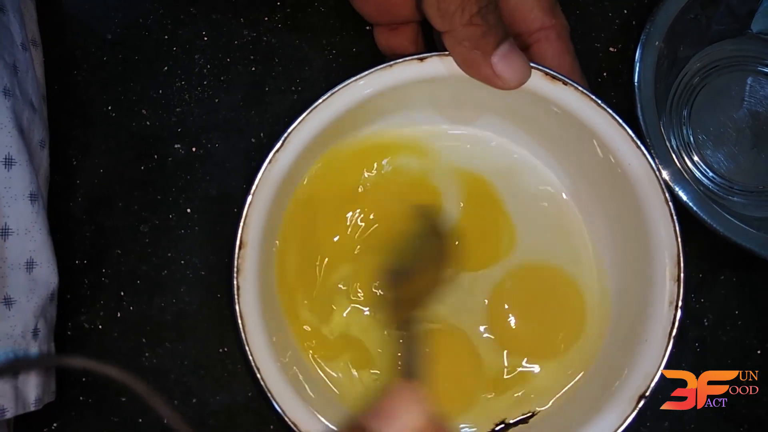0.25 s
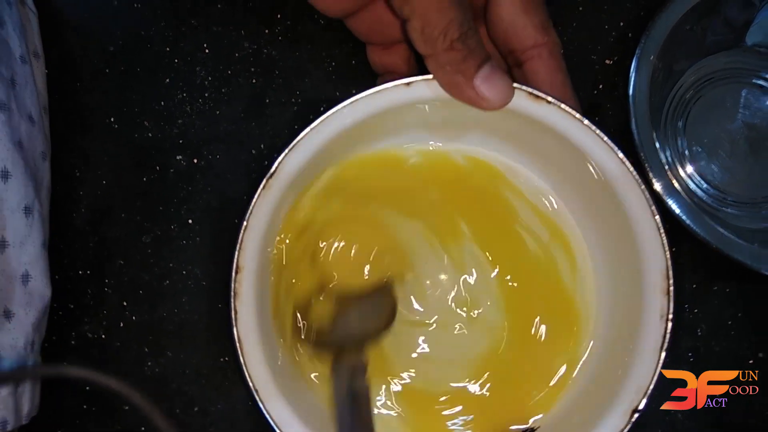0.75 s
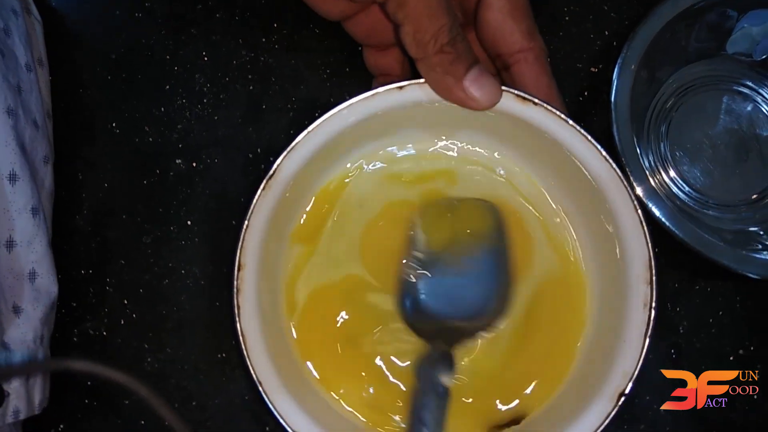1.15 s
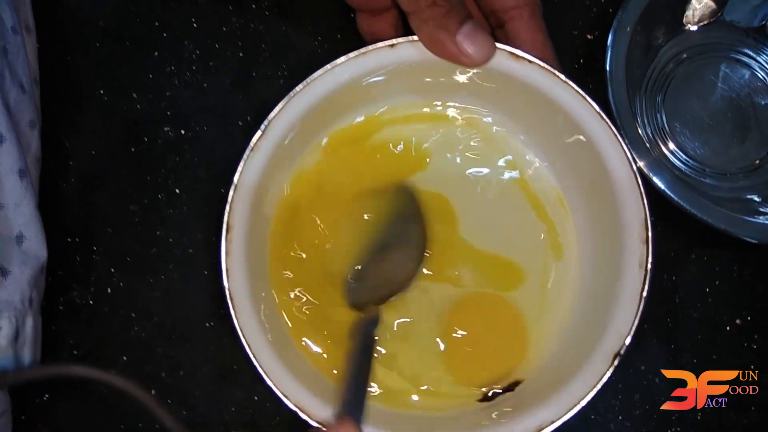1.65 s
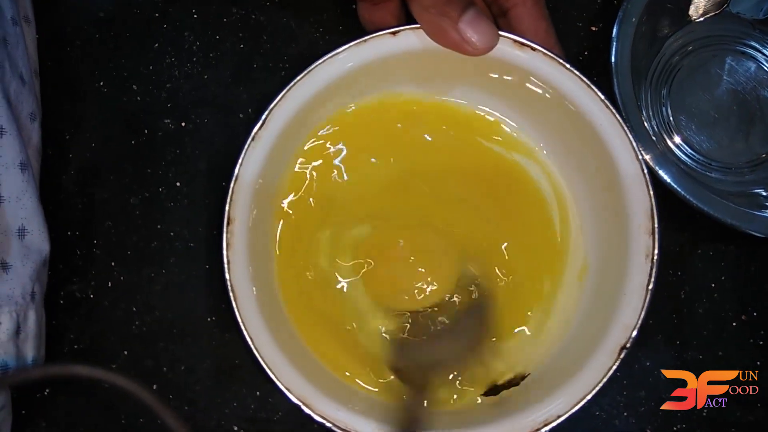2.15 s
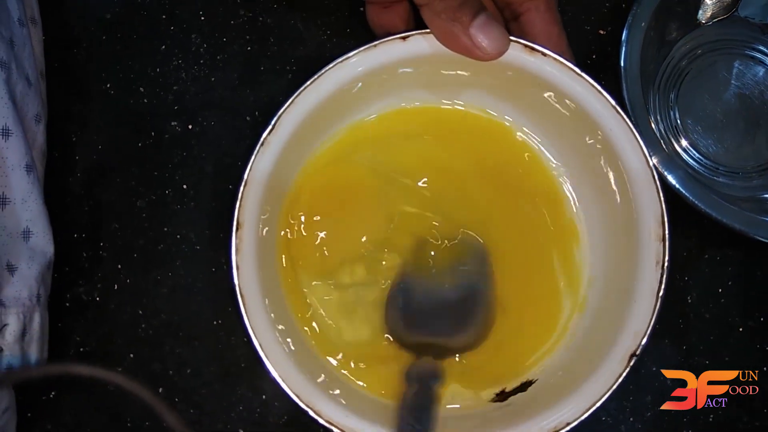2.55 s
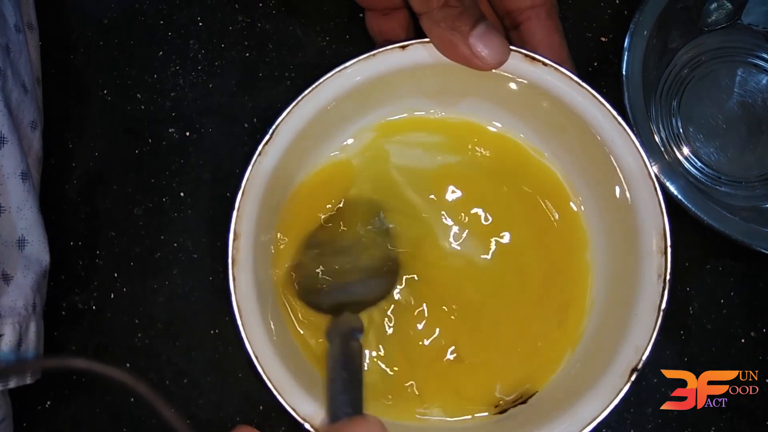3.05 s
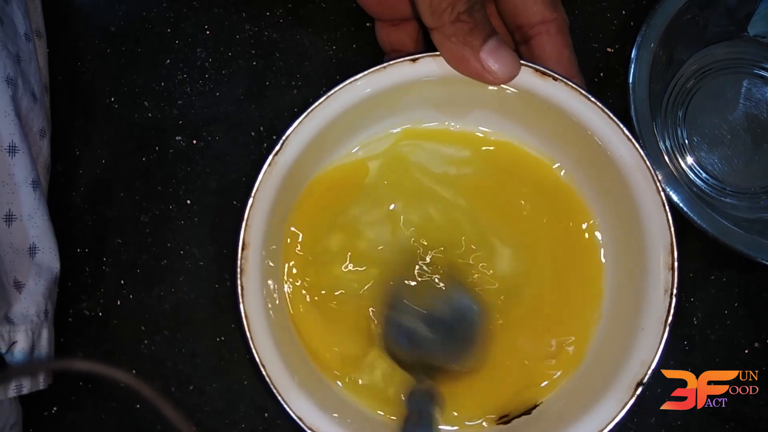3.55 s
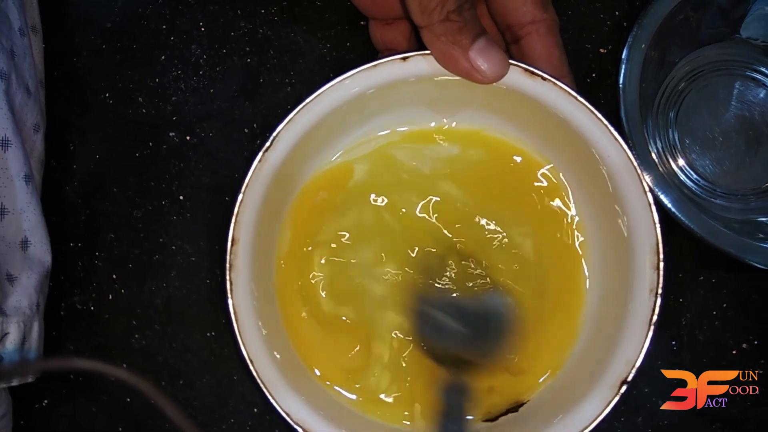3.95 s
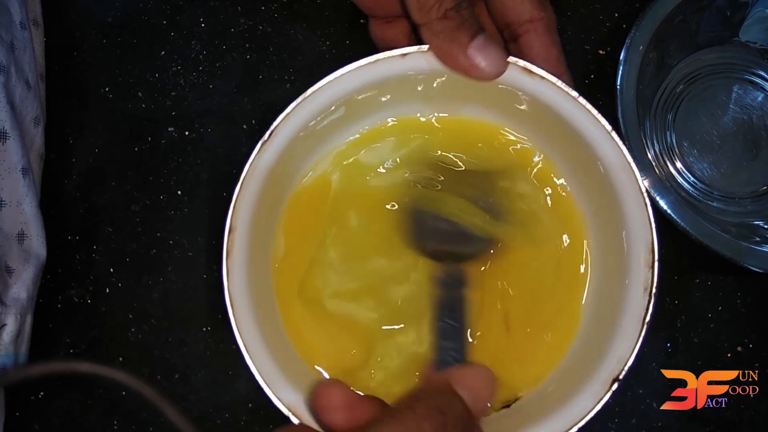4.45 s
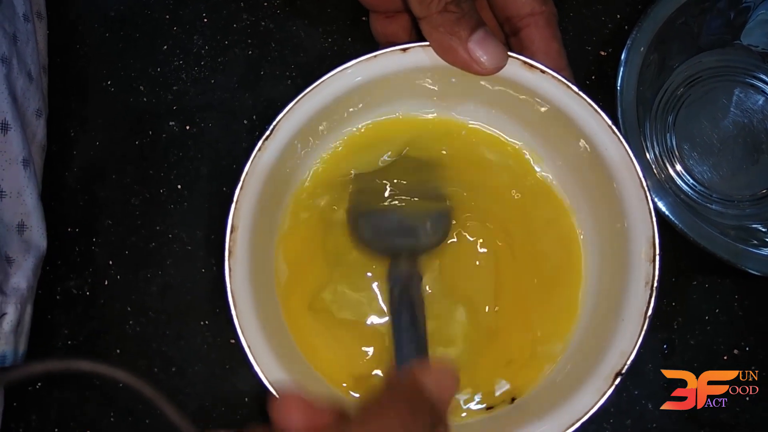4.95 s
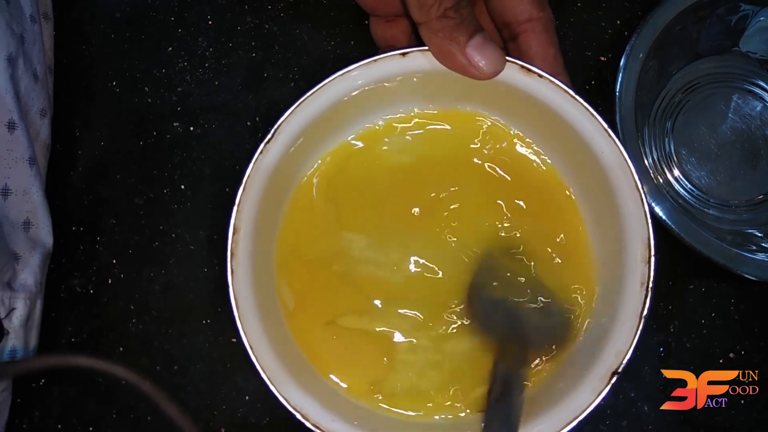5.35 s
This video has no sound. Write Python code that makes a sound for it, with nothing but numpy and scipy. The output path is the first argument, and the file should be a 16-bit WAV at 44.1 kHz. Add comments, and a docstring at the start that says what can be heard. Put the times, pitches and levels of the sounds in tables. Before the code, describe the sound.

Heard from very near in a small kitchen: gritty spoon skids in a bowl, a cluster of hard bright clinks, a short lull, then one loud clack and more irregular knocks. Finally the spoon stays down, rubbing quickly and softly through the egg in regular strokes. Faint low hum and room hiss continue throughout; the stereo image is wide in the treble.

```python
"""A metal spoon beats eggs in an enamelled bowl held by one hand, heard close up in stereo.
Strikes, skids and whisking strokes are bursts of uneven force that ring a model of the bowl.
Single tones of the bowl sing out and bend; sparse random echoes are the kitchen's answer.
Underneath lie a low appliance hum and a soft room noise, both made of filtered noise."""
import sys
import numpy as np
from scipy import signal
from scipy.fft import rfft, irfft
from scipy.io import wavfile
from scipy.ndimage import uniform_filter1d

SR = 44100
rng = np.random.default_rng(int(sys.argv[2]) if len(sys.argv) > 2 else 0)


def store_wav(level_fs):
    """Save 16-bit WAV to argv[1]."""
    pcm = np.round(np.clip(np.atleast_2d(level_fs), -1, 1) * 32767)
    wavfile.write(sys.argv[1], SR, pcm.T.astype(np.int16))


N = 247842  # length of the scene in samples

WHISK_FROM_S, RESTING_DB = 4.035, -47  # the spoon lands; its faint rub between strokes


def spoon():
    """Everything the spoon does: strikes, skids, strokes, singing tones and a faint resting rub."""
    out = np.zeros((2, N))
    for play, table in ((strike, STRIKES), (skid, SKIDS), (stroke, STROKES), (sing, SINGING)):
        for row in table:
            add(out, *play(*row))
    rest_length = N / SR - WHISK_FROM_S + LIFT_S
    add(out, *skid(WHISK_FROM_S, rest_length, RESTING_DB, RESTING_DB, -8.0, -7, step=.08, wet=True))
    return out


# Spoon strikes: (time [s], level before the energy boost [dB],
# middle ring relative to treble [dB], upper ring relative to treble [dB])
STRIKES = [(0.339, -14.5, -9.5, -16.5), (0.441, -23, -22.5, -22), (0.4961, -31, -3.5, -14.5),
           (0.638, -3, -11.5, -8), (0.76, -27, -19.5, -10), (0.7883, 3, -15.5, -10.5),
           (0.8572, 1, -15, -10), (0.9302, 3, -19, -15.5), (1.16, -23.5, -28.5, -23.5),
           (1.7259, 6.5, -19.5, -13.5), (1.734, -4.5, -7.5, -9.5), (1.738, -0.5, -14, -5.5),
           (2.08, 3, -14.5, -14), (2.137, -2.5, -31.5, -12.5), (2.31, -23, -16.5, -13.5),
           (2.368, -1, -27, -11.5), (2.4557, -13, -25, -16), (2.517, -30.5, 0, -10),
           (2.5654, -29.5, -14, -16), (2.591, 3.5, -14, -16.5), (2.834, -3, -16.5, -12),
           (3.2211, -1, -15, -11.5), (3.412, 2, -12.5, -11), (3.62, 3, -15.5, -12),
           (3.667, -10, -16.5, -15.5), (4.0349, -13, -11, -13.5), (4.497, -23.5, -27, -4),
           (4.759, -23, -15, -14.5), (4.784, -17, -34.5, -18.5), (4.8988, -19.5, -20, -13.5),
           (5.013, -15, -30.5, -23), (5.1306, -14, -30, -8.5), (5.288, -12, -20, -21),
           (5.438, -19.5, -16, -9.5), (5.467, -19, -9.5, -11.5)]
TAP_ENERGY_DB = 11.5  # energy of a ring over its peak level
STRIKE_T60_S = 0.02236  # time to fade by 60 dB, for a firm strike
STRIKE_LOW_DB, STRIKE_THUMP_DB = -4.5, -10  # low ring and thump relative to the middle ring
RATTLE_RISE_S = 0.00287  # the rattle after a click builds up


def strike(s, db, middle_db, upper_db):
    """One click with a short rattle; a damped strike also stops the clear tones early."""
    t = np.arange(600) / SR
    t60 = STRIKE_T60_S * np.interp(db, [-30, -5], [.45, 1])  # light ticks die sooner
    rise = np.minimum(t / RATTLE_RISE_S, 1)
    fade = gain_of(-11.5 - 60 * t / max(1.286 * t60, .001))
    force = rise * fade * grit(len(t), spread_db=4.5, lumpy_db=5.0)
    force[0] += 1  # the click itself
    force = force / np.linalg.norm(force)
    ranges_db = [middle_db + STRIKE_THUMP_DB, middle_db + STRIKE_LOW_DB, middle_db, upper_db, 0]
    sound = ring(force, ranges_db, t60, min(t60 / 0.019, .8), clear_db=-7.5)
    return s, gain_of(db + TAP_ENERGY_DB) * sound


def struck(s, within=.013):
    """Whether a strike falls at about this moment."""
    return np.min(abs(np.transpose(STRIKES)[0] - s)) < within


# Spoon skids over the bottom: (time [s], length [s], level at start [dB], level at end [dB],
# middle ring relative to treble [dB], upper ring relative to treble [dB])
SKIDS = [(-0.03, 0.158, -20.5, -32.5, -17.5, -11.5), (0.095, 0.0346, -29.5, -13.5, -24.5, -12.5),
         (0.129, 0.0633, -24, -30.5, -17, -9), (0.196, 0.0784, -35, -36.5, -9, -5.5),
         (0.27, 0.0445, -33.5, -16.5, -18, -9), (0.32, 0.0587, -17.5, -26.5, -19.5, -13.5),
         (0.404, 0.221, -64.5, -47, -6.5, -13.5), (0.635, 0.0632, -24.5, -52.5, -7.5, -6),
         (0.701, 0.051, -33.5, -34, -11.5, -8), (0.753, 0.0937, -18, -25.5, -17, -18),
         (0.86, 0.0842, -19, -21, -19, -12), (0.933, 0.173, -23.5, -36.5, -15, -8.5),
         (1.122, 0.1, -47, -51.5, -13.5, -15), (1.205, 0.299, -49, -43.5, -13.5, -13.5),
         (1.5, 0.225, -47, -51.5, -11, -13), (1.728, 0.1115, -22.5, -30.5, -11.5, -10),
         (2.081, 0.0632, -20.5, -23.5, -16.5, -8), (2.364, 0.0594, -10, -33.5, -16, -11),
         (2.594, 0.072, -17.5, -27.5, -16.5, -12), (2.83, 0.0466, -21.5, -57.5, -9.5, -13),
         (3.214, 0.0483, -25.5, -23.5, -16.5, -14), (3.411, 0.0691, -20.5, -26.5, -17.5, -16),
         (3.63, 0.0687, -33.5, -35, -15, -12.5), (3.85, 0.04976, -31.5, -24.5, -16, -14)]
EDGE_STRUCK_S, EDGE_SOFT_S = 0.01024, .019  # a skid sets in sharply after a strike, softly otherwise
LIFT_S = .022  # the spoon lifts off
LIGHT_DB = -39  # a lighter skid floats on the egg


def skid(s, length, start_db, end_db, middle_db, upper_db, step=.05, wet=False):
    """The spoon touches down, slides with changing pressure and lifts off."""
    edge = EDGE_STRUCK_S if struck(s) else EDGE_SOFT_S
    t = np.arange(round((length + edge / 2 + LIFT_S / 2) * SR)) / SR
    nearness = np.minimum(t / edge, (t[-1] - t) / LIFT_S)
    touch = np.sin(np.pi / 2 * np.clip(nearness, 0, 1)) ** 2
    press = gain_of(start_db + (end_db - start_db) * t / t[-1]) * touch
    start = s - edge / 2 * (not struck(s))
    return start, rub(press, middle_db, upper_db, step, wet or start_db < LIGHT_DB)


# Fast whisking, the spoon staying on the bottom:
# (time of the middle [s], half width [s], level [dB], middle ring relative to treble [dB])
STROKES = [(4.103, 0.0296, -30.5, -15.5), (4.17, 0.02204, -27.5, -15), (4.215, 0.0253, -32.5, -21),
           (4.263, 0.016, -37, -24.5), (4.315, 0.0221, -24.5, -20), (4.391, 0.0304, -27.5, -13.5),
           (4.501, 0.0395, -35, -13), (4.61, 0.02855, -35.5, -13), (4.7, 0.0322, -33, -12.5),
           (4.81, 0.0284, -30.5, -12.5), (4.926, 0.0189, -32, -15), (5.021, 0.0148, -31, -20),
           (5.055, 0.012, -27.5, -20.5), (5.168, 0.0337, -28.5, -14), (5.285, 0.0391, -26, -15.5),
           (5.33, 0.0239, -23.5, -18), (5.44, 0.0392, -25.5, -15), (5.555, 0.0432, -27, -17)]
STROKE_END = 0.648  # a stroke ends quicker than it swells
STROKE_UPPER_DB = -12.5  # upper ring relative to treble


def stroke(s, width, db, middle_db):
    """One swing of the whisking: a swell of rubbing that breaks off."""
    u = np.linspace(-2, 2, round(4 * width * SR))  # time in half widths
    swell = np.exp(-np.minimum(u, 0) ** 2 - np.maximum(u / STROKE_END, 0) ** 3)
    return s - 2 * width, rub(gain_of(db) * swell, middle_db, STROKE_UPPER_DB, step=.03, wet=True)


# On the foaming egg the crowd rings longer, and the clear tones are weaker and more detuned:
# (fade time of the crowd [s], share of the clear fade time [0-1],
# clear tones relative to the crowd [dB], detuning share [0-1])
WET_RING = (0.12, 1, -5.5, 0.2351)
WET_LUMPY_DB = 3  # the wet rub comes in stronger clumps
RUB_LOW_DB, RUB_THUMP_DB = -6.5, -11.5  # relative to the middle ring


def rub(press, middle_db, upper_db, step, wet=False):
    """Grit under the spoon's edge, which travels over spots that each ring in their own colour."""
    force = press * grit(len(press), spread_db=3.5, lumpy_db=WET_LUMPY_DB if wet else 2.2)
    ranges_db = [middle_db + RUB_THUMP_DB, middle_db + RUB_LOW_DB, middle_db, upper_db, 0]
    spots = 2 + int(len(press) / SR // step)  # about one new spot per step seconds
    way = np.linspace(0, spots - 1, len(press))
    near = [np.cos(np.pi / 2 * np.clip(way - k, -1, 1)) for k in range(spots)]
    ringing = WET_RING if wet else (0.052, 0.77, -2.675, .03)  # same columns as WET_RING
    return sum(ring(force * share, ranges_db, *ringing) for share in near)


def grit(n, spread_db, lumpy_db):
    """Tiny collisions of uneven size that come in short clumps."""
    sizes = gain_of(spread_db * np.minimum(rng.exponential(1, n), 4.0)) * rng.standard_normal(n)
    clumps = uniform_filter1d(rng.standard_normal(n + 400), 130)[200:n + 200] * np.sqrt(130)
    force = sizes * gain_of(lumpy_db * clumps)
    return force / np.sqrt(np.mean(force ** 2))


# One tone of the wall sings out alone, bent by the egg sliding over the wall:
# (time [s], length [s], first pitch [Hz], last pitch [Hz], level at start [dB])
SINGING = [(-0.02, 0.067, 984, 1000, -46), (0.182, 0.115, 1575, 1507, -46.5),
           (0.28, 0.103, 1293, 1372, -47.5), (0.297, 0.0985, 991.7, 1027, -50),
           (0.298, 0.0776, 1522, 1627, -48.5), (0.032, 0.107, 3230, 3344, -40.5),
           (0.09, 0.095, 5465, 5510, -44.5), (0.289, 0.072, 5360, 5350, -48.5),
           (0.068, 0.118, 3690, 3869, -42), (0.257, 0.0536, 3250, 3145, -34.5),
           (0.319, 0.0377, 3755, 3744, -31), (0.713, 0.0754, 1742, 1633, -43),
           (0.806, 0.0664, 991, 999, -35.5), (0.788, 0.129, 1362, 1322, -28.5),
           (0.753, 0.028, 3210, 3210, -39), (0.788, 0.068, 3747, 3762, -30.5),
           (0.79, 0.054, 2142, 2175, -38), (0.861, 0.0324, 2965, 3020, -29.5),
           (0.932, 0.097, 3765, 3673, -35), (0.931, 0.07, 2175, 2144, -41),
           (0.933, 0.103, 1018, 1000, -35.5), (1.728, 0.227, 1020, 1000, -33),
           (1.722, 0.1, 1242, 1237, -43), (1.729, 0.0373, 3932, 3763, -16), (1.747, 0.117, 2650, 2649, -35),
           (1.718, 0.232, 692.3, 662, -46.5), (2.095, 0.04, 3600, 3751, -35),
           (2.096, 0.05, 5740, 5466, -33), (2.133, 0.0175, 7800, 7470, -46), (2.383, .03, 5347, 5605, -30),
           (2.371, 0.052, 3700, 3529, -30.5), (2.606, 0.05, 3750, 3575, -36),
           (2.371, 0.0514, 1019, 1000, -30.5), (2.369, 0.051, 1305, 1358, -32.5),
           (2.625, 0.055, 1301, 1306, -46.5), (2.833, 0.0507, 1304, 1259, -34.5),
           (3.221, 0.038, 1313, 1325, -40.5), (3.222, 0.038, 3847, 3660, -29),
           (3.41, 0.087, 1000, 1029, -39), (3.415, 0.0606, 1322, 1285, -30),
           (3.418, 0.032, 578.5, 588, -37.5), (3.627, 0.034, 612, 591, -41),
           (4.162, 0.0574, 1850, 1763, -55.5), (4.147, 0.051, 7074, 7010, -49.5),
           (4.288, 0.058, 1039, 1003, -46), (4.302, 0.0395, 1313, 1303, -48),
           (4.372, 0.06, 1299, 1261, -50.5), (4.391, 0.051, 1000, 1000, -54),
           (4.808, 0.049, 982, 1000, -51), (5.029, 0.0468, 1000, 1000, -48.5),
           (5.255, 0.0506, 1229, 1283, -47.5), (5.304, 0.0423, 979.3, 1026, -42.5),
           (5.406, 0.0634, 1000, 1035, -46.5), (5.412, 0.0556, 3695, 3500, -39.5),
           (5.402, 0.0406, 7095, 7058, -39.5), (5.533, 0.047, 1000, 1000, -52.5)]
# most of a tone that grit may feed unevenly, 0-1; tones under ROUGH_FULL_HZ stay clearer
ROUGH_STRUCK, ROUGH_RUBBED, ROUGH_FULL_HZ = .6, .9, 3000
ROUGH_CYCLES = 11  # smoothing span of the unevenness, in cycles of the tone
SINK_STRUCK_DB, SINK_RUBBED_DB = -17.5, 2  # a struck tone sinks over its length, a rubbed one is fed


def sing(s, length, first_hz, last_hz, db, fade=0.0219):
    """A rough narrow tone that wavers in strength and pitch and then dies quickly."""
    t = np.arange(round((length + 3 * fade) * SR)) / SR
    turns = np.cumsum(np.interp(t, [0, length], [first_hz, last_hz])) / SR + rng.random()
    span = round(ROUGH_CYCLES * SR / first_hz)
    noise = uniform_filter1d(rng.standard_normal((len(t), 2)).T, span)
    a, b = uniform_filter1d(noise, span // 2) * np.sqrt(span * 2 / 3)
    if struck(s):
        sink_db, rough, onset = SINK_STRUCK_DB, ROUGH_STRUCK, .0014
    else:
        sink_db, rough, onset = SINK_RUBBED_DB, ROUGH_RUBBED, EDGE_SOFT_S
    rough = rough * min(first_hz / ROUGH_FULL_HZ, 1)
    feed = np.sqrt(1 - rough ** 2) + rough * (a + 1j * b)
    level_db = db + np.interp(t, [0, length, t[-1]], [0, sink_db, sink_db - 41.0])
    modes, ears = np.array(BOWL), np.array([[.5], [-.5]])
    lead = np.interp(first_hz, modes[:, 0], modes[:, 3])
    wave = (feed * np.exp(1j * (2 * np.pi * turns + ears * lead))).real
    tone = np.sqrt(2) * wave * np.minimum(t / onset, 1)
    return s, tone * gain_of(level_db + ears * read(LEAN, first_hz))


RING = 8192  # length of one tap in samples


def ring(force, ranges_db, crowd_t60, freedom, clear_db, shift=0.02009):
    """A force rings the bowl, each pitch range by its own amount."""
    spectrum = np.tensordot(gain_of(ranges_db), bowl(crowd_t60, freedom, clear_db, shift), 1)
    tap = irfft(spectrum)[:, :RING * 7 // 8]
    return signal.fftconvolve(force[None], tap, axes=1)


# Borders between thump, low, middle, upper and high ring (the treble): (pitch [Hz])
RANGES_HZ = [850, 1700, 5000, 8700]
# Loudness tilt between the ears: (pitch [Hz], left minus right [dB])
LEAN = [(300, -9.5), (700, 3.5), (1300, -1.5), (2200, 1), (3600, 5), (5000, -0.5), (9000, 2), (12000, -2),
        (13000, 4.5), (15500, 11.5)]


def bowl(crowd_t60, freedom, clear_db, shift):
    """Spectrum of one tap at one spot, split in five balanced ranges: ranges x ears x bins."""
    hz = np.fft.rfftfreq(RING, 1 / SR)
    ears = np.array([[.5], [-.5]])
    region = np.digitize(hz, RANGES_HZ) == np.arange(len(RANGES_HZ) + 1)[:, None]
    soft = uniform_filter1d(region * 1., 30, axis=1)[:, None]  # soft borders

    def balanced(x):
        """Splits a spectrum in ranges of equal energy."""
        parts = x * soft
        return parts / np.sqrt(np.mean(abs(parts) ** 2, (1, 2), keepdims=True))

    crowd = balanced(crowded_modes(hz, crowd_t60))
    clear = balanced(clear_modes(hz, ears, freedom, shift))
    both = crowd + gain_of(clear_db) * clear
    return both * gain_of(ears * read(LEAN, hz)) * (hz > 150.)


# Crowd of close modes of bowl and spoon, before each range is balanced:
# (pitch [Hz], relative level [dB per Hz])
CROWD = [(150, -60), (250, -35.5), (420, -19.5), (667, -19.5), (899, -26), (999, -3), (1150, -30.5),
         (1320, -18.5), (2100, -23), (2350, -25), (3100, -19.5), (3650, -15), (4250, -32), (4600, -19.5),
         (5060, -27), (5500, -10), (6300, -24.5), (7050, -2.5), (7700, -17.5), (8300, -7.5), (8930, -4.5),
         (11200, 6.5), (15400, -8), (16500, -8.5)]
# Likeness of the two ears: (pitch [Hz], likeness [-1 to 1])
SAME = [(60, 0.969), (180, 1), (550, 0.405), (1650, 0.047), (4970, -0.333), (15000, 0.31)]
PATCH_HZ, PATCH_DB = 250, 7  # each spot also colours the crowd in patches, up or down


def crowded_modes(hz, t60):
    """Modes too close to tell apart: fading noise, coloured anew for each spot."""
    t = np.arange(RING) / SR
    swell = np.minimum(t / 0.000646, 1)  # the bending waves need a moment to spread
    fade = gain_of(-60 * t / max(t60, .003))
    left, other = rfft(rng.standard_normal((2, RING)) * swell * fade)
    knots = np.arange(0, SR / 2 + PATCH_HZ, PATCH_HZ)
    patches_db = np.interp(hz, knots, rng.uniform(-PATCH_DB, PATCH_DB, len(knots)))
    return two_ears(left, other, hz) * gain_of(read(CROWD, hz) + patches_db)


# Clear modes of the bowl, before damping, detuning and balancing:
# (pitch [Hz], relative level [dB], time to fade by 60 dB [s], phase lead of the left ear [rad])
BOWL = [(627.7, -2, 0.0197, -0.5), (1000, -4, 0.204, -2.19), (1271, 5, 0.129, 6.5), (1315.3, 7, 0.17, 4),
        (1508.3, 1.5, 0.27, 7), (1878.6, -7, 0.169, -2), (2109, -8, 0.32, 1.15), (2612, -7.5, 0.278, 1),
        (3076, -6.5, 0.029, 1.5), (3540, 0, 0.0795, 2), (3703.4, -1, 0.1015, 1), (3997, -3, 0.15, 2),
        (4572, 0, 0.095, 3.5), (5440, -9.5, 0.061, 3.5), (5872, -5, 0.11, 2), (6380, -8.5, 0.074, 2.5),
        (6670, -8.5, 0.029, 3), (7197, -2.5, 0.0384, 0.5), (7470, -13, 0.033, 3.5), (8078, -7, 0.039, 8.5),
        (8955, -10.5, 0.015, 1.5), (9503, -5.5, 0.092, 2.5), (11364, -15.5, 0.064, 1.5),
        (11706, 1.5, 0.0175, 1.5), (12270, -2.5, 0.086, 2.5), (12560, -3.5, 0.05, -2),
        (13890, -3, 0.0695, 4)]
PARTNERS, SPOT_DB = 2, 8  # each mode is a close pair; a spot favours some modes


def clear_modes(hz, ears, freedom, shift):
    """Spectrum of the bowl's clear tones: each one is a resonance that loses energy steadily."""
    f, db, t60, lead = np.repeat(BOWL, PARTNERS, axis=0).T
    detune, twist = rng.standard_normal((len(f), 2)).T
    favour = rng.uniform(-1.5, 1, len(f))
    f = f * (1 + shift * detune * np.minimum(f / 4000, 1))  # the moving egg detunes higher modes most
    phase = ears * (lead + twist * np.minimum(f / 2000, 1))
    drive = gain_of(db + SPOT_DB * favour) * np.exp(1j * phase)
    loss = np.log(1000) / np.maximum(t60 * freedom, .003)
    return drive @ (1 / (loss[:, None] + 2j * np.pi * (hz - f[:, None])))


# How long the kitchen answers: (pitch [Hz], time to fade by 60 dB [s])
KITCHEN = [(500, 0.51), (2000, 0.604), (6000, 0.507), (15000, 0.409)]


def kitchen(x):
    """Sparse echoes of random sign, other ones for each ear."""
    taps = np.zeros((2, SR // 2))
    jitter = rng.integers(0, 20, (2, (SR // 2 - 201) // 20))
    at = np.arange(200, SR // 2 - 20, 20) + jitter
    np.put_along_axis(taps, at, rng.choice([-1., 1.], at.shape), 1)
    tail = dying_noise(taps, lambda hz: read(KITCHEN, hz), size=256)
    return signal.fftconvolve(x, tail / np.linalg.norm(tail[0]), axes=1)[:, :N]


def dying_noise(seed, t60, size):
    """Shapes a noise so that each frequency decays at its own speed."""
    hz, t, z = signal.stft(seed, SR, nperseg=size)
    return signal.istft(z * gain_of(-60 * t / t60(hz)[:, None]), SR, nperseg=size)[1]


# Swells of the lowest hum band: (time [s], level [dB])
DRONE = [(0, -62), (1.2, -62), (3.1, -66), (3.5, -57), (4.7, -58.5), (5.2, -63.5)]
DRONE_HZ, DRONE_WIDTH_HZ = 112.4, 10


def drone():
    """Lowest band of the appliance hum: narrow noise that swells, the same in both ears."""
    t, hz = np.arange(N) / SR, np.fft.rfftfreq(N, 1 / SR)
    band = np.exp(-((hz - DRONE_HZ) / DRONE_WIDTH_HZ) ** 2)
    hum = irfft(rfft(rng.standard_normal(N)) * band, N)
    return hum / hum.std() * gain_of(np.interp(t, *np.transpose(DRONE)))


# Colour of the room noise, before its total level is set: (pitch [Hz], relative level [dB per Hz])
AIR = [(25, -46), (55, -20), (82, -25), (135, -12.5), (185, 1), (240, -6.5), (300, -17.5), (430, -10),
       (700, -13.5), (1200, -17), (2200, -24), (4400, -33), (7000, -53.5), (12000, -28.5), (16000, -59.5)]
AIR_DB = -46.5  # total level of the room noise
# Wavering upper bands of the hum: (pitch [Hz], width [Hz], level [dB])
HUM = [(162.65, 18, -51), (195, 30, -58), (354.7, 12, -61.5)]


def background():
    """Steady room noise with the narrow bands of the hum, nearly alike in both ears in the bass."""
    hz = np.fft.rfftfreq(N, 1 / SR)
    a, b, c, d = rng.standard_normal((len(hz), 4)).T
    air = gain_of(read(AIR, hz)) ** 2
    power = gain_of(AIR_DB) ** 2 * air / air.mean()
    for f, width, db in HUM:
        band = np.exp(-2 * ((hz - f) / width) ** 2)
        power = power + gain_of(db) ** 2 * band / band.mean()
    noise = two_ears(a + 1j * b, c + 1j * d, hz)
    return irfft(noise * np.sqrt(power * N / 2), N) + drone()


def two_ears(left, other, hz):
    """Mixes two independent noise spectra so that the ears are as alike as SAME says."""
    same = np.clip(read(SAME, hz), -1, 1)
    return np.array([left, same * left + np.sqrt(1 - same ** 2) * other])


def gain_of(db):
    """Decibels to a factor."""
    return 10 ** (np.asarray(db) / 20)


def read(points, hz):
    """Reads a table of values over pitch on a logarithmic frequency axis."""
    f, value = np.transpose(points)
    return np.interp(np.log(hz + 1), np.log(f + 1), value)


def add(mix, s, sound):
    """Mixes a sound in at time s; what lies before zero or past the end is dropped."""
    at = round(s * SR)
    sound = sound[..., max(-at, 0):]
    part = mix[..., max(at, 0):][..., :sound.shape[-1]]
    part += sound[..., :part.shape[-1]]


def scene():
    """Spoon and bowl, their echoes, and the background."""
    near = spoon()
    return near + gain_of(-17.0) * kitchen(near) + background()


EDGE_HZ = 15900  # upper limit of the sound


def record(dry):
    """The loudest peaks are rounded off near full scale; then a steep filter limits the treble."""
    rounded = dry / (1 + (dry / 0.956) ** 4) ** (1 / 4)
    steep = signal.firwin(511, EDGE_HZ, window=("kaiser", 9), fs=SR)[None]
    return np.clip(signal.oaconvolve(rounded, steep, "same"), -1, 1)


dry = scene()
out = record(dry)
store_wav(out)
```